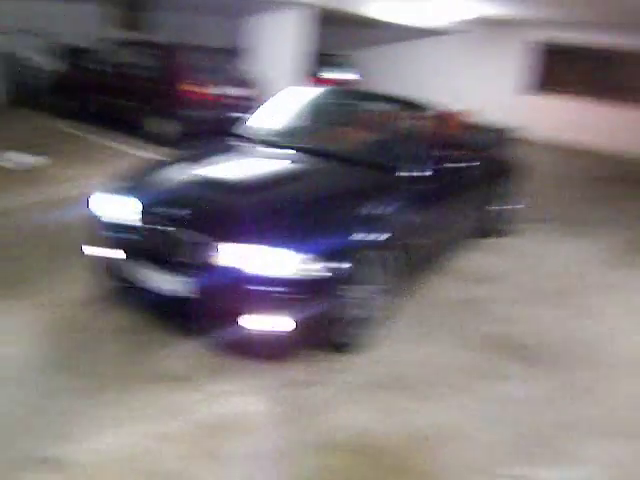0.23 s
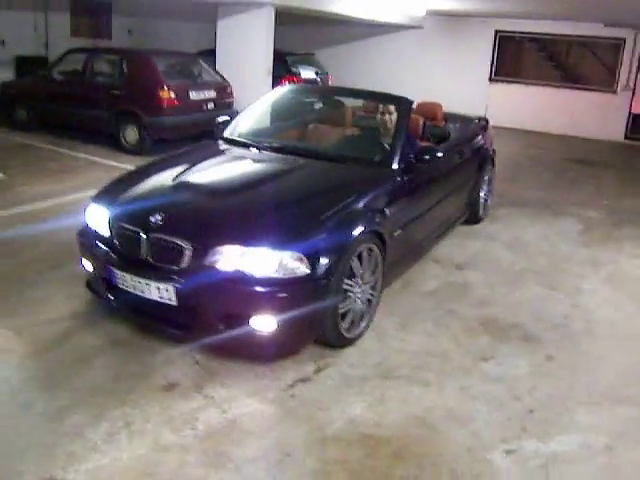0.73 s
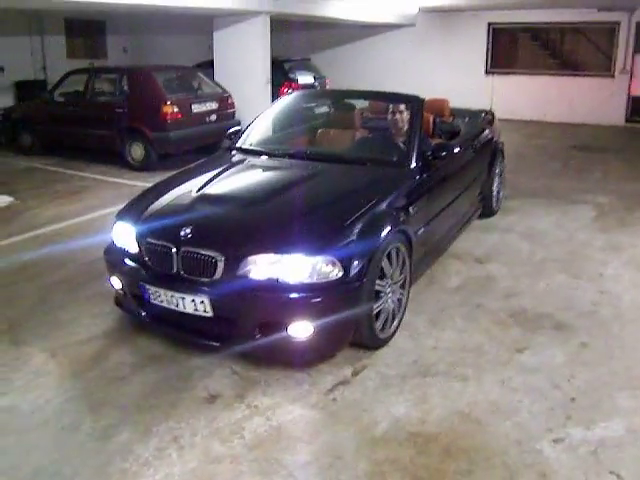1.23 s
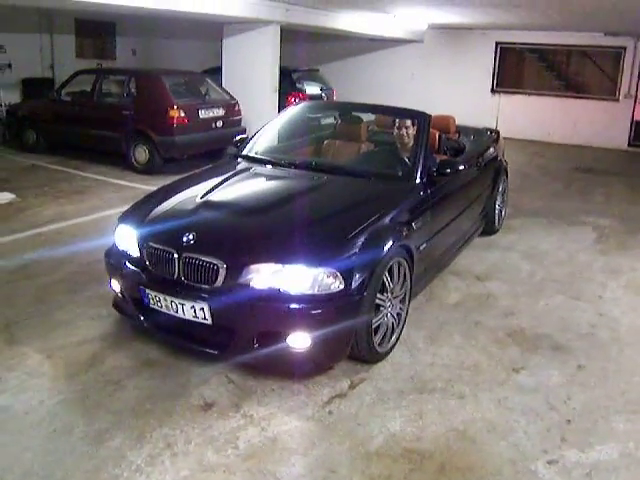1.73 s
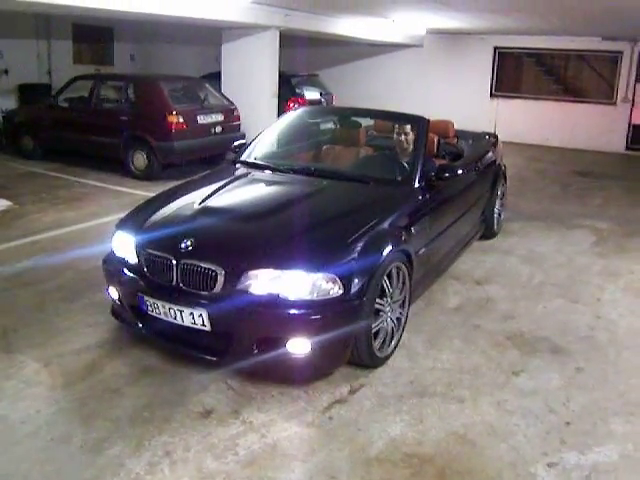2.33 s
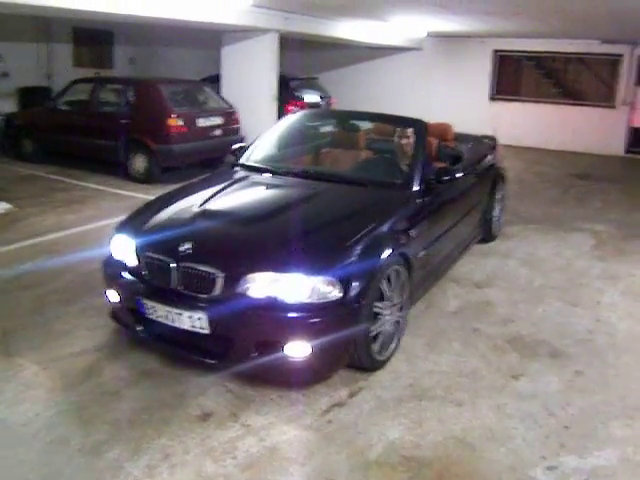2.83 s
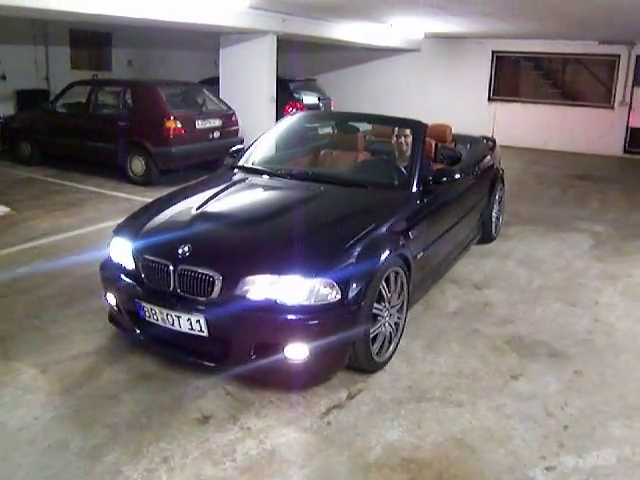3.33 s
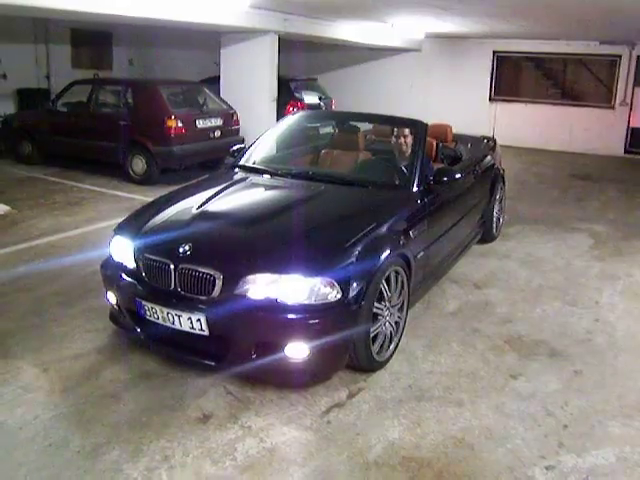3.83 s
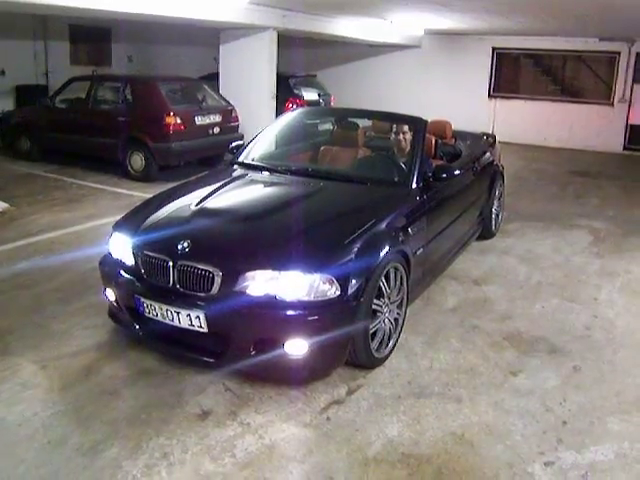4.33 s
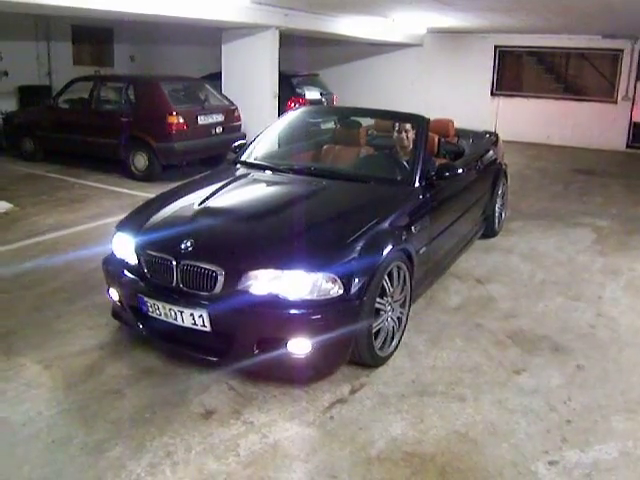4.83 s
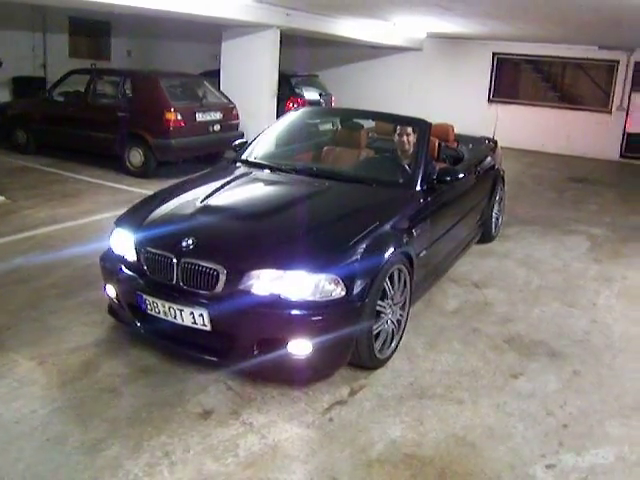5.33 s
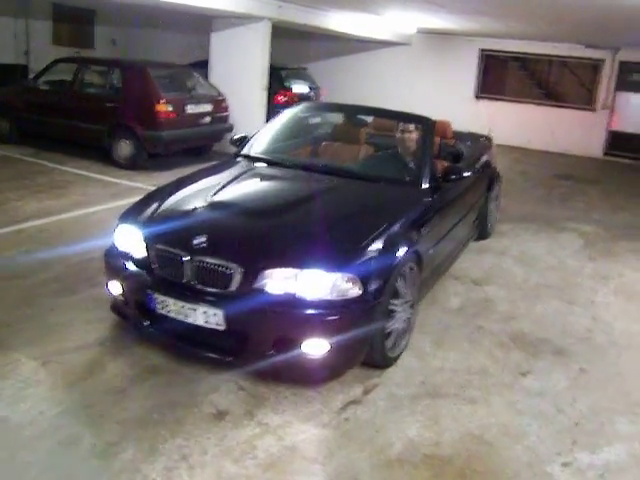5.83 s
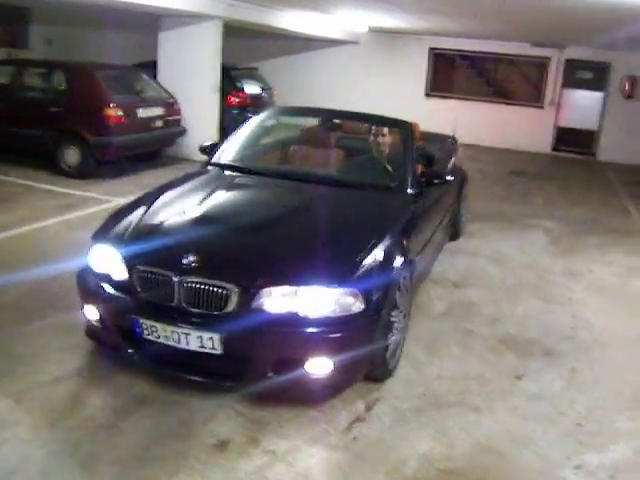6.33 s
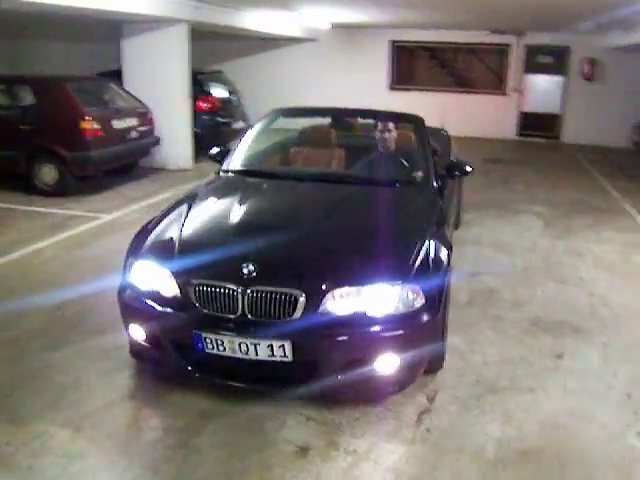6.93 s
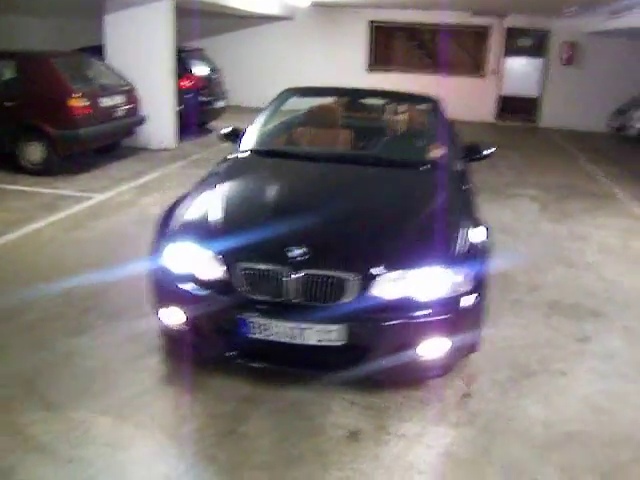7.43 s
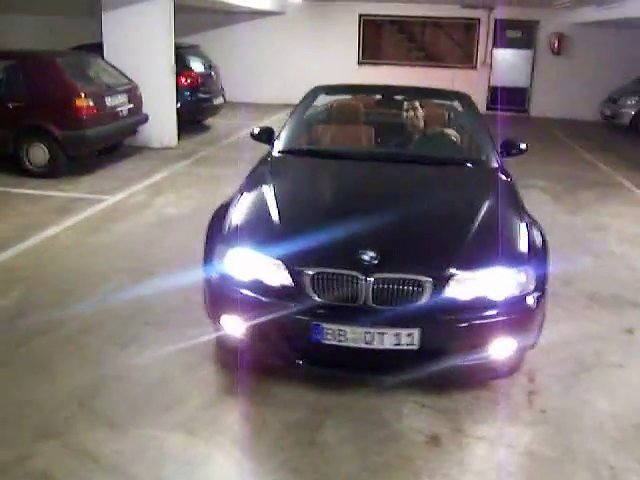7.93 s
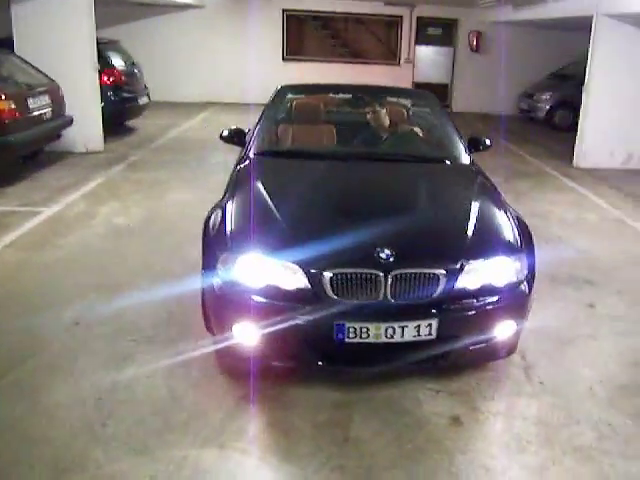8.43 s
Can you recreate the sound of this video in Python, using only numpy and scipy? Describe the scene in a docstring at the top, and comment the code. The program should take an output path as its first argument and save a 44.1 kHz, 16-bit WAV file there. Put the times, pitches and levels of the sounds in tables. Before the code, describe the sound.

A convertible's six-cylinder engine idles in a concrete garage; a sharp clack rings, then the throttle surges to a roar and falls back to idle.

```python
"""A straight-six engine idles in a concrete underground garage; at once a sharp clack close by rings off the walls.
An electric cooling fan whines at a steady pitch. The engine is revved up in surges and falls slowly back to idle.
Sines on the firing rate make its tones; shaken standing waves, coloured noise and ringing pipes its roughness.
Blade-passing sines make the fan, bursts of noise through resonances the clack, feedback delays the walls."""
import sys
import numpy as np
from scipy import signal
from scipy.fft import rfft, irfft, next_fast_len
from scipy.io import wavfile
from scipy.ndimage import uniform_filter1d

SR = 44100
rng = np.random.default_rng(int(sys.argv[2]) if len(sys.argv) > 2 else 0)


def voltage_ratio(decibels):
    """Convert decibels (scalar or array-like) to amplitude ratios, 20 dB per decade."""
    exponent = np.asarray(decibels, float) / 20
    return 10 ** exponent


def to_wav(sig):
    """Store sig (one row per channel, or 1-D mono) as 16-bit WAV at the path in sys.argv[1].

    Samples outside -1..1 are clipped; the rate is SR.
    """
    pcm = np.clip(np.atleast_2d(sig), -1, 1) * 32767
    pcm = np.round(pcm).astype(np.int16)
    wavfile.write(sys.argv[1], SR, pcm.T)  # frames by channels


N = 382347


def rms_one(x):
    """Normalisation: scale to unit rms."""
    return x / np.sqrt(np.mean(x ** 2) + 1e-20)


def evened(x, window_s):
    """Envelope flattening: divide by the running rms."""
    return x / np.sqrt(uniform_filter1d(x ** 2, size=int(window_s * SR)) + 1e-12)


def in_time(rows):
    """Linear interpolation: table columns as curves, one value a sample."""
    times, *columns = np.transpose(rows)
    return [np.interp(np.arange(N) / SR, times, column) for column in columns]


def lag(x, seconds):
    """First-order relaxation: one-pole smoothing with this time constant."""
    r = np.exp(-1 / (seconds * SR))
    return signal.lfilter([1 - r], [1, -r], x - x[0]) + x[0]


def drift(rate_hz):
    """Low-pass random process: slow chance of unit rms, drawn every 40 samples."""
    r = np.exp(-2 * np.pi * rate_hz * 40 / SR)
    slow = signal.lfilter([1], [1, -2 * r, r * r], rng.standard_normal(N // 40 + 2002))[2000:]
    return np.interp(np.arange(N) / 40, np.arange(len(slow)), rms_one(slow))


def resonances(x, modes):
    """Modal superposition: parallel two-pole resonances of alternating sign."""
    out = 0
    for k, (hz, width_hz, level_db) in enumerate(modes):
        r = np.exp(-np.pi * width_hz / SR)
        numerator = [(1 - r * r) / 2, 0, (r * r - 1) / 2]
        denominator = [1, -2 * r * np.cos(2 * np.pi * hz / SR), r * r]
        out = out + (-1) ** k * voltage_ratio(level_db) * signal.lfilter(numerator, denominator, x)
    return out


# engine speed: (time [s], firing rate [1/s])
ENGINE_SPEED = [(0, 41.8), (.5, 43), (1.67, 42.4), (1.8, 55), (1.88, 75), (1.96, 100), (2.16, 144),
                (2.3, 168), (2.42, 180), (2.55, 215), (2.82, 271), (2.95, 297), (3.12, 278), (3.45, 241.5),
                (4.0, 179), (4.29, 153.4), (4.51, 127.6), (4.81, 107), (5.11, 81.4), (5.42, 73.5),
                (5.6, 63), (5.92, 49.7), (6.05, 46.6), (6.19, 44.6), (6.32, 42.2), (6.95, 44.2),
                (7.36, 44.2), (7.9, 43.1), (8.67, 42.5)]


def firing_rate():
    """Rotational inertia: the flywheel smooths every change of speed."""
    return uniform_filter1d(in_time(ENGINE_SPEED)[0], size=SR // 14)


# levels as heard: bay noise and the two lower tones drop at the clack as the recorder's gain falls;
# the late swell comes from walking round to the front of the car:
# (time [s], bay noise [dB], firing and half-rate tones [dB], double-rate tone [dB])
HEARD_LEVELS = [(0, 13, 9, -2), (.07, 15, -2, -12), (.09, -0.5, -9.5, -2), (1.1, -0.1, -8, -7.5),
                (1.6, 0, -10.5, -6), (1.8, 2.35, -1.8, 0.5), (5.0, 1.58, 1.1, -6.8), (5.6, 2, -1, -4),
                (6.12, 3.5, -1.5, 5), (6.8, 8.5, -0.5, 9.5), (7.49, 14, -4, 14), (7.92, 16.5, -1, 19),
                (8.32, 14, 2.7, 15.5), (8.67, 13, -.5, 17)]


def levels_as_heard():
    """Time-varying gain: each part of the engine is heard at its own changing level."""
    return in_time(HEARD_LEVELS)


# standing waves that the exhaust tones sweep through: (frequency [Hz], width [Hz], tone level on the peak [dB])
TONE_STANDING_WAVES = [(32, 4, -24.5), (38.7, 6.9, -24), (42.91, 2.84, -18), (47.8, 0.46, -14.5),
                       (48.8, 4.4, -21.5), (53.5, 4, -19), (63.3, 2.4, -22.5), (73.6, 15, -19.5),
                       (90.6, 13, -30.5), (105.7, 2.7, -29), (132, 6, -45), (145.6, 18, -35),
                       (173, 14, -34), (198, 10, -35.5), (215.5, 7.6, -27.5), (241, 38, -25.5),
                       (277, 58, -31), (410, 200, -30.5)]


def boom_db(hz):
    """Frequency response of standing waves: the powers of all peaks add at this pitch."""
    power = sum(voltage_ratio(2 * db) / (1 + (2 * (hz - centre) / width) ** 2) ** 2
                for centre, width, db in TONE_STANDING_WAVES)
    return 10 * np.log10(power)


HALF_DB, DOUBLE_DB = -2.5, -11   # against the firing tone
HALF_FOLLOWS, DOUBLE_FOLLOWS = 0.29, 0.31   # share of the tone gain that half and double rate get


def tone_levels(per_s, tone_gain_db):
    """Subharmonics of uneven firing: the half-rate tone vanishes at an even idle; three levels in dB."""
    _, low_db, high_db = levels_as_heard()
    even = np.clip((48.5 - per_s) / 4.0, 0, 1)
    firing_db = boom_db(per_s) + low_db + tone_gain_db
    half_db = boom_db(per_s / 2) + low_db + HALF_DB + HALF_FOLLOWS * tone_gain_db - 35 * even
    double_db = boom_db(2 * per_s) + high_db + DOUBLE_DB + DOUBLE_FOLLOWS * tone_gain_db
    return firing_db, half_db, double_db


# weaker tones, fading under load:
# (multiple of the firing rate [1], level against the firing tone, itself counted as -31 dB at most [dB])
WEAK_TONES = [(2 / 3, -13.5), (4 / 3, -25)]


def exhaust_tones(per_s, phase, load, tone_db, half_db, double_db):
    """Periodic excitation: sines on the firing rate, steadier off load, shaken in level and phase under load."""
    shaken = phase + .9 * load * drift(14)
    out = voltage_ratio(tone_db) * np.sin(shaken)
    out += voltage_ratio(half_db) * np.sin(shaken / 2 + 1)
    out += voltage_ratio(double_db) * np.sin(2 * shaken + 2)
    fast = np.clip((per_s - 45) / 40, 0, 1)
    out += voltage_ratio(double_db - 13) * (1 - fast) * np.sin(3 * phase)   # the sharp idle pulse has a third multiple
    for multiple, level_db in WEAK_TONES:
        weak_db = np.minimum(tone_db, -31) + level_db + 3 * drift(3)
        out += voltage_ratio(weak_db) * fast * (1 - load) * np.sin(multiple * phase)
    flutter_db = (1.5 + 2.6 * load) * drift(22)
    return np.sqrt(2) * out * voltage_ratio(flutter_db)


# standing waves that ring on after a tone has swept past: (frequency [Hz], width [Hz], gain [dB])
LINGERING_WAVES = [(36.7, 3, -3), (45.3, 1.8, -12), (53.8, 1.9, -2), (75.1, 2.8, -4.5)]


def ringing(tones):
    """Free decay: narrow standing waves go on sounding once excited."""
    return resonances(tones, LINGERING_WAVES)


# strength of each cylinder's pulse, in firing order: relative level [dB]
CYLINDER_PULSES = [-2.5, -7.5, -11, -7, -9.5, -9.5]


def firings(phase, spread_db):
    """Impulse train: one click a firing, sized by its cylinder and by chance."""
    count = np.maximum.accumulate(np.abs(phase) // (2 * np.pi)).astype(int)
    at = np.flatnonzero(np.diff(count)) + 1
    clicks = np.full(N, 1e-18)
    chance_db = spread_db * rng.standard_normal(2000)[:len(at)]
    clicks[at] = voltage_ratio(np.array(CYLINDER_PULSES)[count[at] % 6] + chance_db)
    return clicks


# low standing waves of exhaust and garage: (frequency [Hz], width [Hz], relative level [dB])
LOW_STANDING_WAVES = [(19, 9.3, 13.5), (29.6, 4.8, 3), (51, 13, 1.5), (77, 15, 4), (98, 15, -13),
                      (143.3, 13, -4.5), (186, 8, -11.5)]


def rumble(phase):
    """Forced resonance: uneven firings and turbulence shake the low standing waves."""
    clicks = firings(phase + 1.5 * drift(52), spread_db=10.5)
    uneven = evened(clicks - uniform_filter1d(clicks, size=2000), 0.092)
    turbulence = 1.1 * rng.standard_normal(N)
    booming = resonances(uneven + turbulence, LOW_STANDING_WAVES)
    low = signal.sosfilt(signal.butter(2, 260, fs=SR, output="sos"), booming)
    return evened(low, 0.47)


# colour of the bay noise: (frequency [Hz], relative level per hertz [dB])
IDLE_SPECTRUM = [(140, -18), (190, -11), (260, -6), (330, -13), (480, -12), (610, -6.5), (700, -9.5),
                 (820, -5.5), (980, -13.5), (1120, -9.5), (1460, -15), (1900, -18), (2400, -16),
                 (3300, -21), (7070, -32.5), (8860, -34.5)]
REV_SPECTRUM = [(150, -8.5), (300, -9.5), (560, -3), (850, -12.5), (1100, -5.5), (1500, -7.5), (2400, -7.5),
                (3500, -12), (5580, -19.5), (7300, -25.5), (8860, -24)]


def bay_noise(per_s, patchy_db):
    """Spectral shaping: narrow noise bands change colour with speed; growl and hiss, each of running rms 1."""
    growl_and_hiss = [0, 0]
    edges = 146 * 2 ** (np.arange(31) / 5)   # five bands an octave
    revving = np.clip((per_s - 45) / 120, 0, 1)
    white, together = rng.standard_normal((2, N)), drift(3.7)
    for k, (low, high) in enumerate(zip(edges, edges[1:])):
        band = signal.sosfilt(signal.butter(2, [low, high], "band", fs=SR, output="sos"), white[k % 2])
        hz = np.sqrt(low * high)
        idle_db, rev_db = [np.interp(np.log(hz), np.log(np.array(colour)[:, 0]), np.array(colour)[:, 1])
                           for colour in (IDLE_SPECTRUM, REV_SPECTRUM)]
        patches_db = patchy_db * (0.54 * together + drift(9.0))
        growl_and_hiss[int(hz > 1500)] += voltage_ratio(idle_db + revving * (rev_db - idle_db) + patches_db) * band
    return [evened(part, 0.62) for part in growl_and_hiss]


# noise of the coasting engine: (firing rate [1/s], growl level [dB], hiss level [dB])
COASTING_NOISE = [(43, -39, -42.5), (94, -41, -42.5), (127, -38.5, -38), (177, -34, -33.5), (237, -31, -29),
                  (300, -32.5, -27.5)]


def coasting_levels(per_s):
    """Speed dependence of flow noise: growl and hiss levels in dB with the throttle closed."""
    speeds, growl_db, hiss_db = np.transpose(COASTING_NOISE)
    return np.interp(per_s, speeds, growl_db), np.interp(per_s, speeds, hiss_db)


# cooling fan: (time [s], blade tone [dB], second multiple [dB], third multiple [dB])
FAN_LEVELS = [(0, -44, -34, -28), (.12, -57, -49.5, -49), (.7, -51, -48, -42.5), (1.23, -44, -54.5, -53),
              (1.74, -35.5, -39.5, -58), (2.4, -41, -44, -40), (3.2, -37, -40, -56),
              (4.4, -44, -55.5, -58.5), (5.6, -36.5, -52, -49.5), (6.62, -41, -43.5, -43),
              (7.4, -31, -42.5, -35), (7.87, -22.5, -30.5, -24.5), (8.11, -20.5, -43, -30),
              (8.3, -25, -28, -29.5), (8.67, -28.5, -32, -28)]


def fan():
    """Blade-passing tone: a harmonic series up to the fourth multiple, each member fluttering."""
    levels_db = in_time(FAN_LEVELS)
    blade_hz = 227.8 + 0.3946 * drift(0.748) + 0.68 * drift(4.9)
    phase = 2 * np.pi * np.cumsum(blade_hz) / SR
    levels_db.append(levels_db[2] - 15)   # fourth multiple
    return np.sqrt(2) * sum(voltage_ratio(db + 2.1 * drift(6.1)) * np.sin((k + 1) * phase)
                            for k, db in enumerate(levels_db))


# what the clack rings with: (frequency [Hz], width [Hz], gain [dB])
CLACK_RESONANCES = [(308, 150, -3), (770, 130, 2.5), (1380, 1200, -1), (2170, 500, 2.5), (3080, 340, -3),
                    (4630, 540, 0.5), (7400, 1200, -22.5)]
CLACK_S, CLACK_DB, REBOUND_S, REBOUND_LOSS_DB = .0695, 14, .0047, 8.5


def clack():
    """Impact excitation: a blow and four rebounds, dying noise through broad resonances; also the bare blows."""
    blows, k = np.full(N, 1e-18), np.arange(5)
    blows[((CLACK_S + REBOUND_S * k) * SR).astype(int)] = voltage_ratio(CLACK_DB - REBOUND_LOSS_DB * k)
    decay = np.exp(-1 / (0.0022 * SR))   # time constant 2.2 ms
    cracks = signal.lfilter([1], [1, -decay], blows) * rng.choice([-1, 1], N)
    return resonances(cracks + 1e-18, CLACK_RESONANCES), blows


def bright_knock(blows):
    """Impulse response: the bare blows ring high resonances on their way to the walls."""
    ring = resonances(blows, [(1920, 1200, 0), (4640, 930, 0.83)])
    ring = signal.sosfilt(signal.butter(6, 5300, fs=SR, output="sos"), ring)
    return ring + resonances(blows, [(6800, 740, -12.5)])


GARAGE_T60_S, WALL_CUT_HZ = 1, 20000


def garage(x):
    """Reverberation: ten feedback delays, duller on every round, scattered by three all-passes."""
    n = next_fast_len(N + 2 * SR)
    turns = -2j * np.pi * np.arange(n // 2 + 1) / n   # one sample of delay at each frequency
    dull = np.exp(-2 * np.pi * WALL_CUT_HZ / SR)
    walls = (1 - dull) / (1 - dull * np.exp(turns))
    answer = 0
    for k, delay in enumerate(np.geomspace(.023, .071, 10) * SR // 1):
        loop = voltage_ratio(-60 * delay / SR / GARAGE_T60_S) * walls * np.exp(turns * delay)
        answer = answer + (-1) ** k * loop / (1 - loop)
    for delay in (71, 191, 421):
        late = np.exp(turns * delay)
        answer = answer * (late - .65) / (1 - .65 * late)
    return irfft(rfft(x, n) * answer, n)[:N]


# prods of the throttle, and last the burble of the overrun as the pedal is lifted:
# (start [s], rise time [s], time constant of decay [s], growl gain [dB], hiss gain [dB], tone gain [dB])
SURGES = [(1.66, 0.2, .03, 12, 9.5, 21), (1.928, 0.086, 0.13, 15, 6, 23),
          (2.281, 0.092, 0.097, 16.5, 4.5, 18.5), (2.545, 0.015, 0.12, 13, 1.5, -8),
          (2.75, 0.064, 0.19, 12.5, 4.5, 6.5), (2.999, 0.031, .2, 6.5, -0.5, 3)]
HELD_S, TONES_HELD_S = .03, 0.052


def surge_gains():
    """Envelope: each surge rises, is held and decays, the tones held longer; growl, hiss and tone gains in dB."""
    t = np.arange(N) / SR
    gains_db = []
    for column, held_s in ((3, HELD_S), (4, HELD_S), (5, TONES_HELD_S)):
        surges = []
        for row in SURGES:
            start_s, rise_s, decay_s = row[:3]
            risen = np.clip((t - start_s) / rise_s, 0, 1)
            since_hold = np.maximum(t - start_s - rise_s - held_s, 0)
            surges.append(row[column] * risen * np.exp(-since_hold / decay_s))
        gains_db.append(np.max(surges, axis=0))   # the largest surge counts, so a negative gain never does
    return gains_db


FIRST_PROD_S, BURBLE_S = SURGES[0][0], SURGES[-1][0]
RUMBLE_RISE_S, RUMBLE_HOLD_S, RUMBLE_FALL_S = .26, 0.27, 0.65
RUMBLE_IDLE_DB, RUMBLE_REV_DB, RUMBLE_COAST_DB = -48, -19, -39.5


def rumble_level():
    """Build-up and decay: rumble swells with the first prod and dies away after the burble begins; in dB."""
    return in_time([(FIRST_PROD_S, RUMBLE_IDLE_DB), (FIRST_PROD_S + RUMBLE_RISE_S, RUMBLE_REV_DB),
                    (BURBLE_S + RUMBLE_HOLD_S, RUMBLE_REV_DB),
                    (BURBLE_S + RUMBLE_HOLD_S + RUMBLE_FALL_S, RUMBLE_COAST_DB)])[0]


FULL_LOAD_DB = 15   # growl gain of a wide-open throttle
RAGGED_WHILE_CLIMBING, RAGGED_ON_SURGE = 0.31, 0.53   # share of ragged intake growl


def raggedness():
    """Load dependence: from 0 to 1, partly held from first prod to burble, partly following each surge's growl."""
    climbing, = in_time([(FIRST_PROD_S, 0), (FIRST_PROD_S + RUMBLE_RISE_S, 1),
                         (BURBLE_S, 1), (BURBLE_S + RUMBLE_HOLD_S, 0)])
    following = surge_gains()[0] / FULL_LOAD_DB
    return np.clip(RAGGED_WHILE_CLIMBING * climbing + RAGGED_ON_SURGE * following, 0, 1)


# intake and exhaust pipes: (frequency [Hz], width [Hz], relative level [dB])
PIPE_RESONANCES = [(361, 110, -1), (540, 29, 7), (624, 34, 5), (878, 29, -3), (1036, 29, 0.5),
                   (1317, 43, -5)]


def intake_growl(phase):
    """Pipe resonance: each ragged firing and a puff of air after it ring the pipes."""
    clicks = firings(phase + 1.2 * drift(60), spread_db=3.0)
    puffs = evened(signal.lfilter([1], [1, -.993], clicks), .1) * rng.standard_normal(N)
    return evened(resonances(evened(clicks, 0.3) + 3.6 * puffs, PIPE_RESONANCES), 0.04)


def intake_rush():
    """Turbulent flow noise: air tearing past the open throttle plate."""
    return rms_one(resonances(rng.standard_normal(N), [(5040, 2900, 0.4), (7340, 1700, -2.4)]))


def scene():
    """Superposition: engine, fan and clack near by; engine tones, growl and the clack's knock also off the walls."""
    per_s = firing_rate()
    phase = 2 * np.pi * np.cumsum(per_s) / SR
    growl_gain_db, hiss_gain_db, tone_gain_db = surge_gains()
    load = raggedness()
    bay_db = levels_as_heard()[0]
    growl_db, hiss_db = coasting_levels(per_s)
    growl_db = growl_db + bay_db + growl_gain_db
    hiss_db = hiss_db + bay_db + lag(hiss_gain_db, 0.013)   # hiss follows each surge a little late

    smooth, hiss = bay_noise(per_s, patchy_db=0.84)
    growl = np.sqrt(load) * intake_growl(phase) + np.sqrt(1 - load) * smooth
    hiss = hiss + voltage_ratio(-3.0) * load * intake_rush()
    throb = 1 + 0.04 * np.cos(phase)   # every firing swells the noise a little
    tones = exhaust_tones(per_s, phase, load, *tone_levels(per_s, tone_gain_db))
    lumps_db = 4 * drift(5.0)
    engine = tones + ringing(tones) + voltage_ratio(rumble_level() + lumps_db) * rumble(phase)
    engine = engine + throb * (voltage_ratio(growl_db) * growl + voltage_ratio(hiss_db) * hiss)

    knock, blows = clack()
    to_walls = .07 * tones + voltage_ratio(-24.0) * voltage_ratio(growl_db) * growl + voltage_ratio(-7.0) * bright_knock(blows)
    return (engine + fan() + knock + garage(to_walls))[None]


LIMIT_DB, LIMIT_RATIO = -14, 0.4   # threshold; dB of gain lost per dB above it
LIMIT_ATTACK_S, LIMIT_RELEASE_DB_PER_S = 0.0064, 90   # release of the level above threshold, before the ratio


def limiter(x):
    """Gain control: loud moments pull the gain down fast; it comes back at a steady rate."""
    level_db = 10 * np.log10(uniform_filter1d(x ** 2, size=1500) + 1e-12)
    over_db = np.maximum(level_db - LIMIT_DB, 0)
    ramp = LIMIT_RELEASE_DB_PER_S * np.arange(N) / SR
    held_db = np.maximum.accumulate(over_db + ramp) - ramp
    return x * voltage_ratio(-LIMIT_RATIO * lag(held_db, LIMIT_ATTACK_S))


def band_limit(x):
    """A steep low-pass at the top of the band."""
    return signal.sosfilt(signal.butter(12, 9010, fs=SR, output="sos"), x)


def record(dry):
    """Band limiting and saturation: loud moments duck, the microphone drops the deepest bass, peaks round, top cut."""
    x = limiter(dry[0])[None]
    x = signal.sosfilt(signal.butter(2, 20, "high", fs=SR, output="sos"), x)
    x = .85 * np.tanh(x / .85)
    x = signal.sosfilt(signal.cheby2(10, 50, 9200, fs=SR, output="sos"), x)   # 50 dB down from 9200 Hz
    return band_limit(x)


dry = scene()
out = record(dry)
to_wav(out)
```